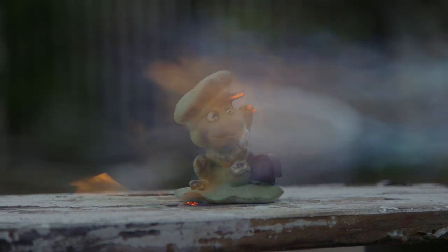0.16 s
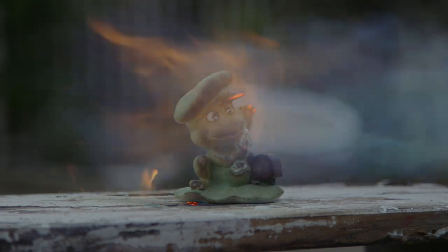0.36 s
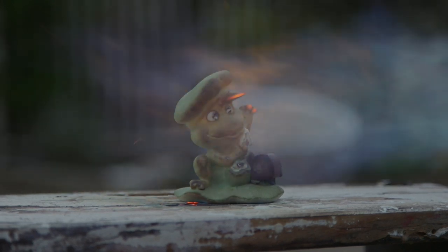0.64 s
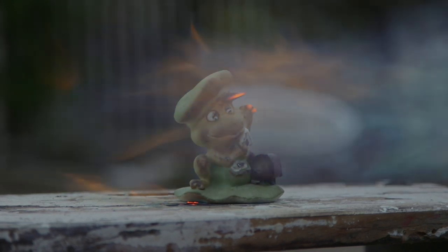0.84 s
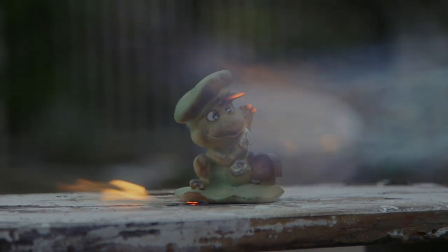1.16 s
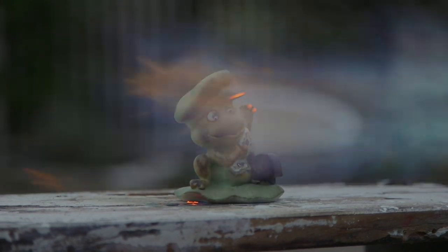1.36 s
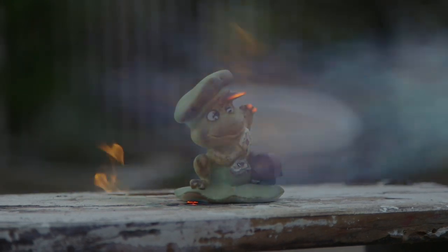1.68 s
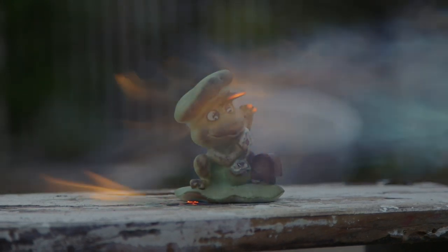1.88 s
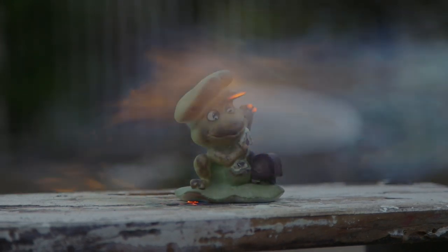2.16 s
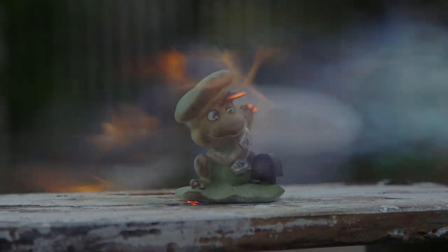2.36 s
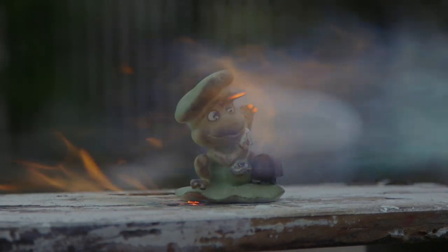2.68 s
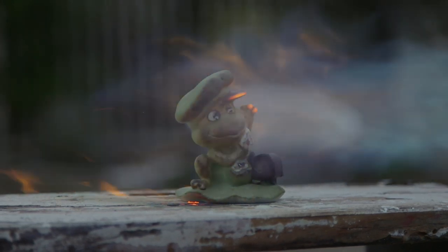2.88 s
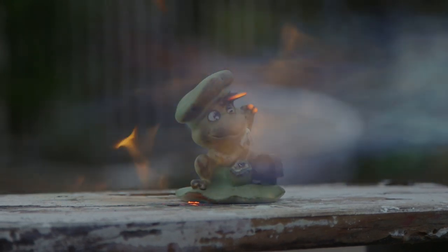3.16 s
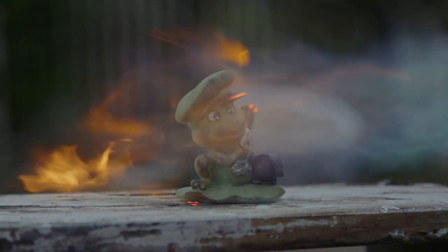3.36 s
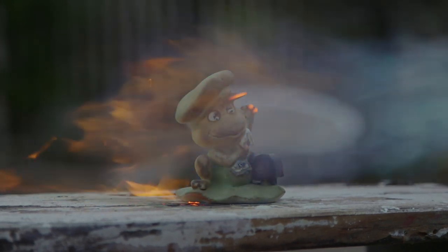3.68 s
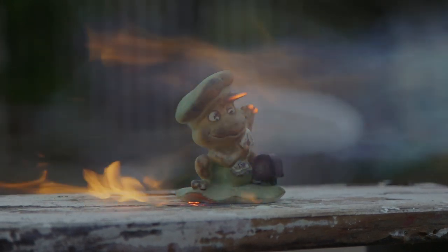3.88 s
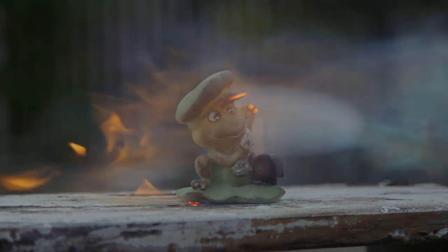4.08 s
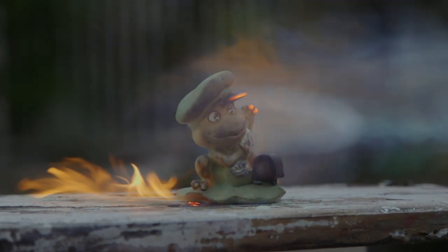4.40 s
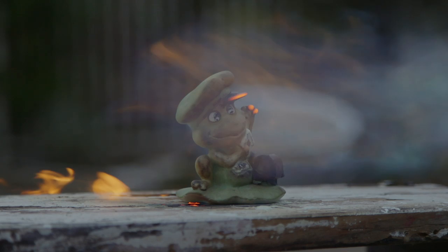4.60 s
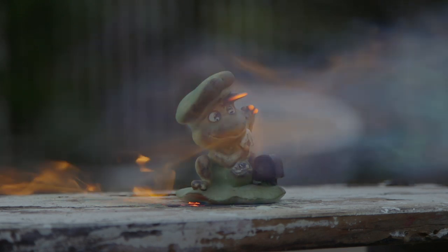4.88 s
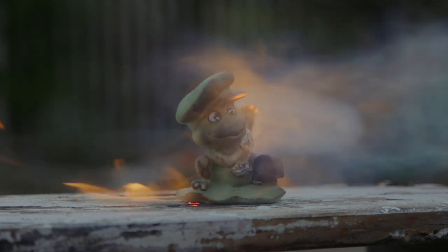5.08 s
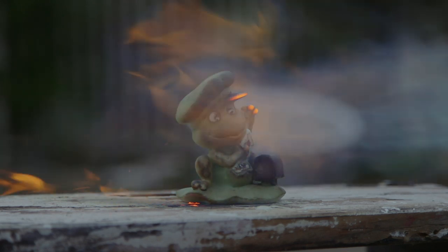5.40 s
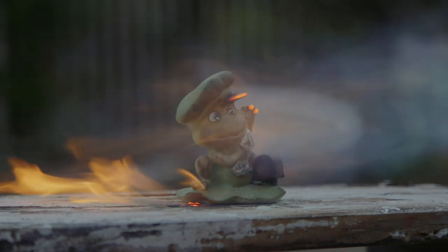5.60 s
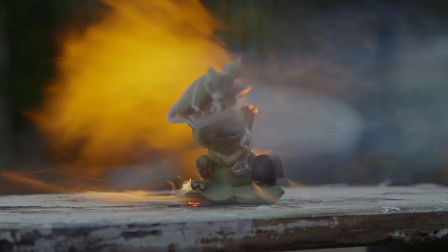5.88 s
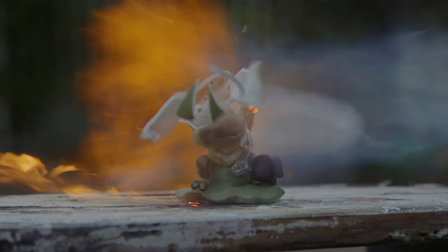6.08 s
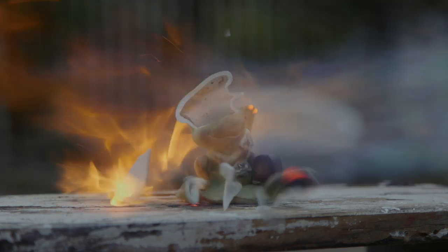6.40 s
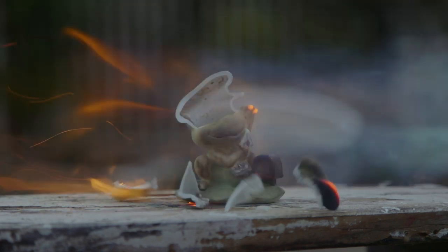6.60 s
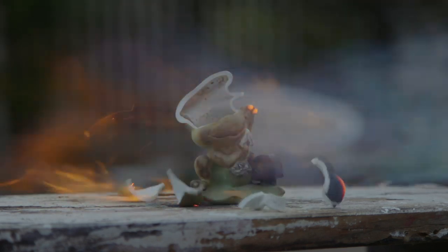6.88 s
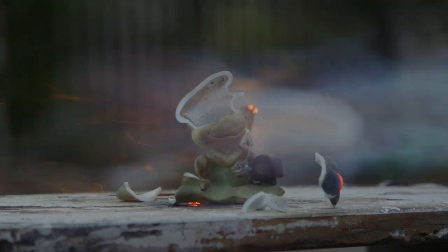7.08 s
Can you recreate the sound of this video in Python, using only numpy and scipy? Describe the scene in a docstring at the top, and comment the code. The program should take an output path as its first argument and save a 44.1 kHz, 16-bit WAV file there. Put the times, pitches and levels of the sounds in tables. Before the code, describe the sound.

Heard from beside a wooden bench outdoors, a gas flamethrower gives one continuous rushing roar. Burning gas rumbles underneath with small, quick surges, while the tube hums with a hollow, slightly wavering tone and the nozzle hisses evenly. From about halfway, a ceramic figure in the flame ticks faintly a few times with the heat, and the roar carries on unchanged.

```python
"""A steady, turbulent roar: a gas flamethrower outdoors, aimed at a ceramic figure on a wooden bench.
Burning gas rumbles with brief swells, the burner tube hums at its resonance, and the jet hisses through
the nozzle with a faint edge whistle. The heated figure gives four faint cracks.
Short echoes off nearby surfaces colour the burner's noise."""
import sys
import numpy as np
from scipy.fft import rfft, irfft, next_fast_len
from scipy.io import wavfile
from scipy.ndimage import uniform_filter1d, map_coordinates

SR = 44100
rng = np.random.default_rng(int(sys.argv[2]) if len(sys.argv) > 2 else 0)


def bounce(signal):
    """Save signal as a 16-bit WAV file at the path given by the first command-line argument."""
    frames = np.transpose(np.atleast_2d(signal))
    limited = np.clip(frames, -1, 1)
    pcm = np.round(limited * 32767).astype(np.int16)
    wavfile.write(sys.argv[1], SR, pcm)


N = 319725

# combustion noise: (frequency [Hz], density [dB])
FLAME_SPECTRUM = [(20, -18.5), (49, -3.5), (75, 1), (120, -1.5), (185, 0.5), (225, -0.4), (275, -0.5),
                  (342, -5.5), (385, -2.5), (440, -3), (515, -2.1), (542, -5.5), (636, -8.5), (775, -18),
                  (1055, -22.5), (1932, -57.5), (3000, -120)]
# brief random swells of the low rumble, plus one dip: (time [s], gain [dB])
RUMBLE_SWELLS = [(0.132, 9), (0.967, 3.5), (2.205, 4), (2.304, -6), (3.137, 3.5), (3.956, 6), (4.41, 7.5),
                 (5.338, 5), (5.465, 6), (6.293, 7), (6.49, 5)]
# swells and sags of the tube hum: (time [s], gain [dB], half-width [s])
HUM_SWELLS = [(0.1, -3.5, .03), (0.354, 3, 0.019), (0.43, 2, 0.028), (0.897, 3.5, 0.039),
              (1.106, 2.5, 0.024), (1.37, 3, .03), (1.719, 9.5, 0.018), (1.92, -6, 0.021),
              (2.73, -7.5, 0.028), (2.85, 1.5, 0.028), (3.16, 3, 0.033), (3.28, -6.5, .06),
              (3.462, 5, 0.02), (3.7, -9, 0.018), (3.92, 2.5, .025), (4.53, 2, 0.027), (4.753, 6, 0.023),
              (5.11, -5, .04), (5.3, -6, .035), (5.466, 2, 0.019), (5.544, 7.5, 0.021), (5.82, -3.5, 0.039),
              (6.15, 3.5, 0.028), (6.608, 6, 0.027), (6.674, 6.5, 0.027)]
# jet noise: (frequency [Hz], density [dB])
JET_SPECTRUM = [(100, -120), (300, -28), (906, -9), (1060, -4), (1155, -7.5), (1220, -2), (1294, -2.5),
                (1622, 1), (1915, -0.5), (2130, 0), (2343, -1), (2680, -8.5), (2820, -8.5), (2991, -12.5),
                (3653, -13.5), (4133, -27), (5045, -35.5), (5631, -32), (8117, -45.5), (8867, -47)]
# nozzle cavities: (frequency [Hz], half-width [Hz], level [dB])
NOZZLE_MODES = [(1795, 63, 1.5), (2002, 30, -0.2), (2500, 25, -7.5), (2570, 28, -3.5), (7540, 170, -35.5)]
# cracks: (time [s], level [dB], snap centre [Hz], snap half-width [Hz], ring centre [Hz], ring gain [dB])
HEAT_CRACKS = [(3.7008, -49, 7800, 1000, 7600, -15), (3.7372, -46, 7100, 550, 7600, -19),
               (4.5354, -44, 8800, 600, 8800, -14), (5.6964, -31, 5000, 2200, 6900, -21)]
# figure's modes: (frequency [Hz], level [dB], T60 [s])
CERAMIC_MODES = [(5700, 0.5, 0.096), (6970, -3.5, .05), (7550, -1, 0.11), (8600, -6, .13), (9130, -4, .14)]
# nozzle edge tones: (frequency [Hz], half-width [Hz], level [dB], flutter [dB])
EDGE_TONES = [(6110, 130, -68, 1.5), (5660, 130, -82, 1.5)]
# nearby surfaces: (delay [s], level [dB])
REFLECTIONS = [(.00388, -30), (.00464, -16), (.00499, -23.5), (.00551, -27.5), (.00655, -28),
               (.0081, -27.5)]

# valve stays open: constant base levels
RUMBLE_DB, ROAR_DB, HUM_DB, JET_DB = -28.5, -23, -27.5, -34


def flame(split_hz=130, swell_half_s=0.022, swell_in_roar=0.13):
    """Large eddies of burning gas rumble; small ones roar."""
    low_share = lambda hz: 1 / (1 + (hz / split_hz) ** 8)
    rumble = turbulence(lambda hz: colour(FLAME_SPECTRUM, hz) * np.sqrt(low_share(hz)))
    roar = turbulence(lambda hz: colour(FLAME_SPECTRUM, hz) * np.sqrt(1 - low_share(hz)))
    swells = bell_gain([(at_s, db, swell_half_s) for at_s, db in RUMBLE_SWELLS])
    roar *= surge(depth_db=0.14) * swells ** swell_in_roar
    return amp(RUMBLE_DB) * swells * rumble + amp(ROAR_DB) * roar


def burner_tube():
    """The flame drives the tube's air column: a breathy hum whose pitch drifts with the heat."""
    hum = turbulence(lambda hz: resonance(hz, centre_hz=613.5, half_hz=40.2), hold_samples=SR // 7)
    hum = waver(hum, depth=0.01109, rate_hz=7)
    return amp(HUM_DB) * surge(depth_db=0.95) * bell_gain(HUM_SWELLS) * hum


def gas_jet():
    """Fast gas hisses and rings the nozzle cavities."""
    def spectrum(hz):
        cavity_power = sum((amp(db) * resonance(hz, mode_hz, half_hz)) ** 2
                           for mode_hz, half_hz, db in NOZZLE_MODES)
        return np.sqrt(colour(JET_SPECTRUM, hz) ** 2 + cavity_power)

    return amp(JET_DB) * turbulence(spectrum) * surge(depth_db=0.4)


def heat_cracks(snap_t60_s=0.005, rise_s=0.0003, mode_half_hz=70):
    """Each heat crack snaps and rings the ceramic modes, most strongly near its ring centre."""
    out = np.zeros(N + SR)
    t = np.arange(SR // 6) / SR
    onset = 1 - np.exp(-t / rise_s)

    def band(centre_hz, half_hz):
        return unit(filtered(rng.standard_normal(len(t)), lambda hz: resonance(hz, centre_hz, half_hz)))

    for at_s, db, snap_hz, snap_half_hz, ring_hz, ring_db in HEAT_CRACKS:
        snap = band(snap_hz, snap_half_hz) * amp(-60 * t / snap_t60_s)
        ring = np.zeros(len(t))
        for mode_hz, mode_db, t60_s in CERAMIC_MODES:
            drive = resonance(mode_hz, ring_hz, half_hz=920)
            ring += drive * amp(mode_db - 60 * t / t60_s) * band(mode_hz, mode_half_hz)
        out[round(at_s * SR):][:len(t)] += amp(db) * onset * (snap + amp(ring_db) * ring)
    return out[:N]


def nozzle_whistle():
    """Faint edge tones, wavering in pitch and level."""
    out = np.zeros(N)
    for centre_hz, half_hz, db, flutter_db in EDGE_TONES:
        whistle = turbulence(lambda hz: resonance(hz, centre_hz, half_hz))
        out += amp(db) * surge(flutter_db, rate_hz=22) * waver(whistle, depth=0.009, rate_hz=18)
    return out


def echo_comb(hz, scatter_hz=3600):
    """Direct path plus short echoes; rough surfaces scatter their treble away."""
    echoes = sum(amp(db) * np.exp(-2j * np.pi * hz * delay_s) for delay_s, db in REFLECTIONS)
    return 1 + echoes / (1 + (hz / scatter_hz) ** 4)


def turbulence(response, hold_samples=SR // 5):
    """Coloured noise with echoes, held at rms 1 over a sliding window."""
    noise = unit(filtered(rng.standard_normal(N), lambda hz: response(hz) * echo_comb(hz)))
    power = np.abs(uniform_filter1d(noise ** 2, hold_samples))
    return noise / np.sqrt(power + 1e-9)


def wander(rate_hz):
    """Smooth curve through rate_hz Gaussian knots per second."""
    return map_coordinates(rng.standard_normal(1024), [np.arange(N) * rate_hz / SR], mode="wrap")


def surge(depth_db, rate_hz=7):
    """Smooth random gain around 1."""
    return amp(depth_db * wander(rate_hz))


def waver(x, depth, rate_hz):
    """Random pitch drift; depth is a fraction of the pitch."""
    drift = wander(rate_hz)
    position = np.arange(N) + depth * np.cumsum(drift - drift.mean())
    return map_coordinates(x, [position], order=5, mode="mirror")


def bell_gain(events):
    """Unity gain with a Gaussian rise or dip per event."""
    t = np.arange(N) / SR
    return amp(sum(db * np.exp(-((t - at_s) / half_s) ** 2) for at_s, db, half_s in events))


def colour(points, hz):
    """Gain from (frequency [Hz], level [dB]) points on a log axis."""
    point_hz, db = np.transpose(points)
    return amp(np.interp(np.log(hz + 1), np.log(point_hz + 1), db))


def resonance(hz, centre_hz, half_hz):
    """Peak of gain 1, 6 dB down at half_hz off centre."""
    return 1 / (1 + ((hz - centre_hz) / half_hz) ** 2)


def filtered(x, response):
    """Apply a frequency response by padded FFT."""
    size = next_fast_len(len(x) + SR // 4)
    hz = np.fft.rfftfreq(size, 1 / SR)
    return irfft(rfft(x, size) * response(hz), size)[:len(x)]


def amp(db):
    """dB to gain."""
    return 10 ** (np.asarray(db) / 20)


def unit(x):
    """Scale to rms 1."""
    return x / np.sqrt(np.mean(x ** 2) + 1e-20)


def scene(skew=0.02):
    """Mono mix beside the bench."""
    burning = flame() + burner_tube()
    # combustion pressure swings further down than up
    burning = burning * (1 - skew * unit(burning)) + skew * burning.std()
    return (burning + gas_jet() + heat_cracks() + nozzle_whistle())[None]


def record(dry, fade_s=0.004, low_hz=14, top_hz=9500):
    """Fade-in and band limit."""
    fade = np.minimum(np.arange(N) / (fade_s * SR), 1)
    passband = lambda hz: hz ** 4 / (hz ** 4 + low_hz ** 4) * (hz < top_hz)
    return filtered(dry[0] * fade, passband)[None]


dry = scene()
out = record(dry)
bounce(out)
```